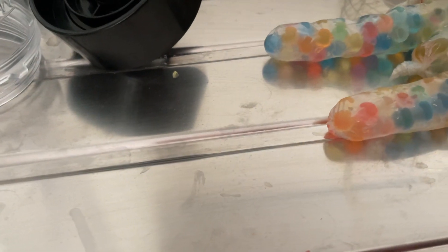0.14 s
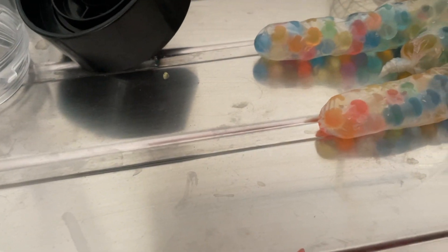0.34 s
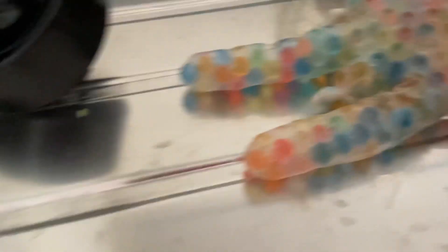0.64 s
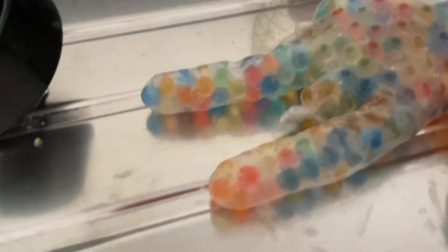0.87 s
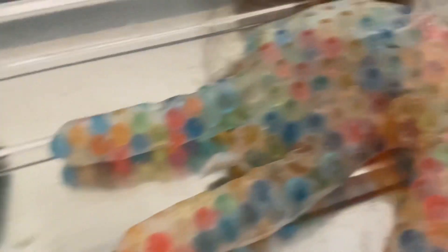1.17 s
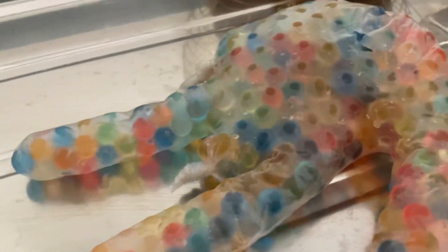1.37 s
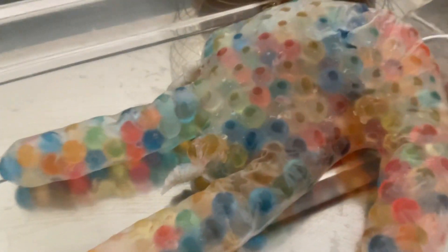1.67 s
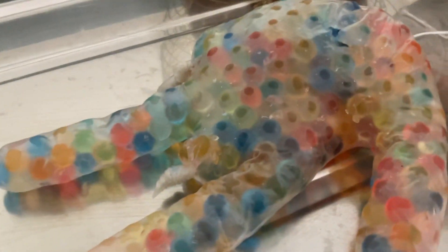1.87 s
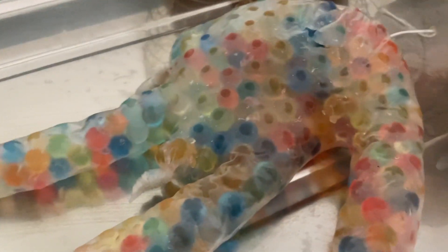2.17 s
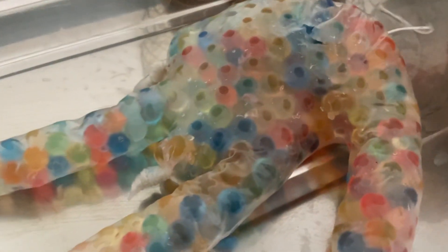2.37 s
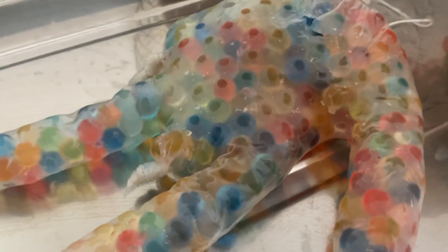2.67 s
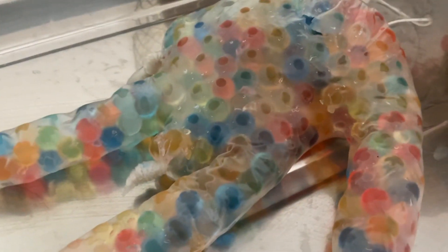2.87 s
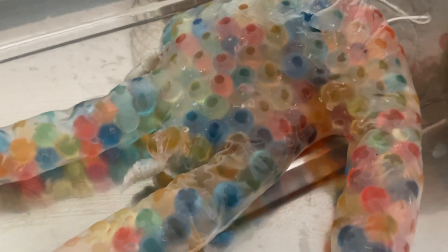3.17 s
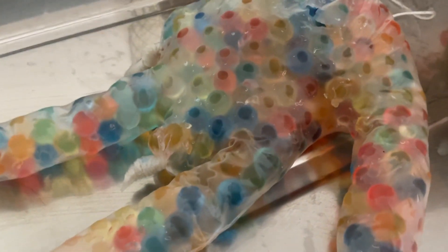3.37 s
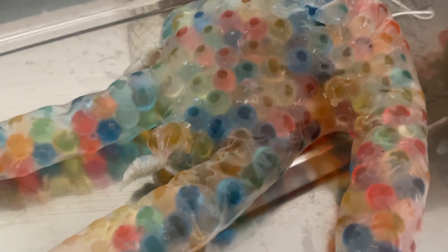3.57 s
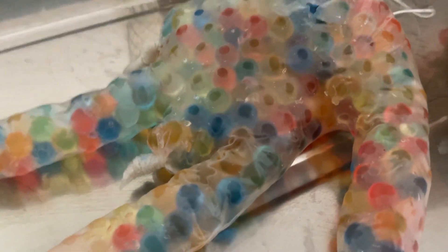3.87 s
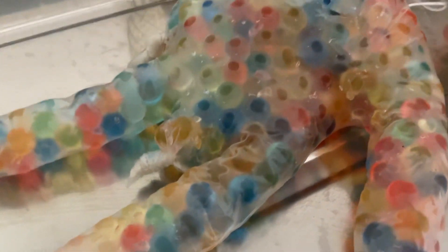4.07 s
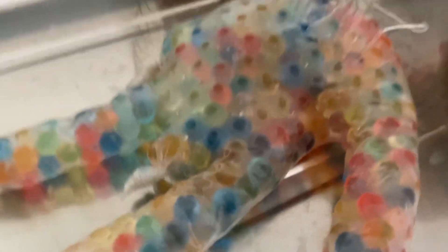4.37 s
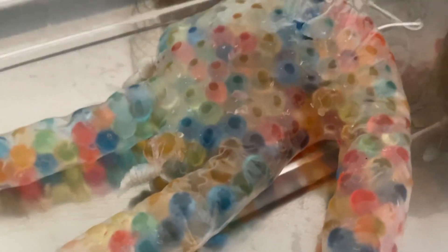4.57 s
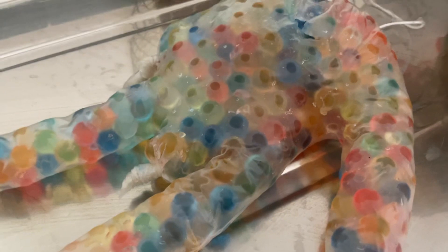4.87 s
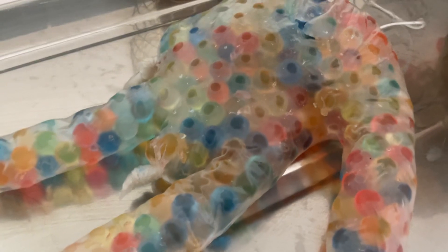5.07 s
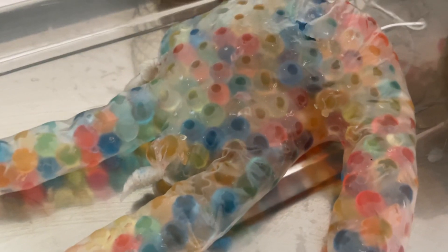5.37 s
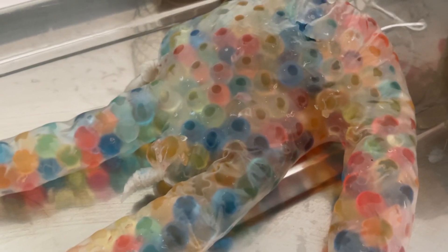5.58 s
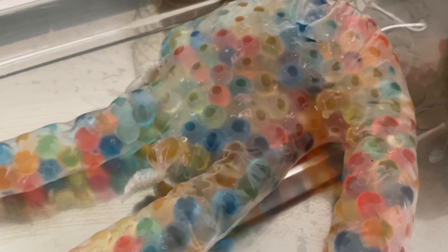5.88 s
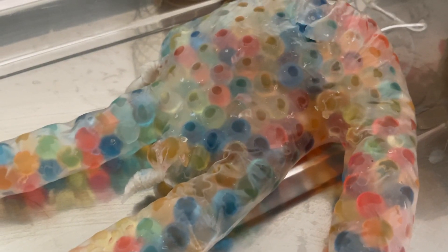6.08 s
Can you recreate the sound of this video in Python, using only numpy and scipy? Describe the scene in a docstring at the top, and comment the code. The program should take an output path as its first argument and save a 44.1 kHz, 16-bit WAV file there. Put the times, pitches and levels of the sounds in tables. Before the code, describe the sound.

A wet rubber glove full of beads is rubbed and squeezed on a metal tray, with squeaks, small snaps and dull knocks.

```python
"""A rubber glove full of wet beads, handled on a metal tray in a small hard room.
Rubber and fingers slide with a hiss of tiny slips, let go with snaps and squeak by stick-slip.
Knocks ring the tray and counter, metal clinks once; drips and the bright clicks of knocks tick sharply.
The hand holding a phone just above the tray rumbles. A clatter dies away at the start;
a motor hums over room tone and microphone hiss."""
import sys
import numpy as np
from scipy import signal
from scipy.fft import rfft, irfft
from scipy.io import wavfile
from scipy.ndimage import uniform_filter1d

SR = 44100
rng = np.random.default_rng(int(sys.argv[2]) if len(sys.argv) > 2 else 0)


def wrap_up_sound(samples):
    """Save the sound to the file named by the first command line argument, as 16-bit audio."""
    columns = np.atleast_2d(samples).T
    # keep every value between -1 and 1, then stretch to whole-number steps
    tamed = np.clip(columns, -1, 1)
    steps = np.round(tamed * 32767).astype(np.int16)
    wavfile.write(sys.argv[1], SR, steps)


N = 274743

# room tone and microphone hiss spectrum: freq_hz, density_db
AIR_SPECTRUM = [(24, -47), (40, -18), (106, -2.5), (140, -13), (203, -5.5), (224, -17), (281, -8),
                (361, -18), (389, -13.5), (552, -17.5), (726, -31), (980, -31.5), (1790, -37.5),
                (12200, -37), (15700, -40)]
# motor lines: freq_hz, rms_db
MOTOR_LINES = [(48.4, -78.5), (102.3, -74.5), (118.4, -72), (193.8, -80), (274.5, -79), (296.1, -75.5),
               (441.4, -81.5), (489.9, -80.5), (543.7, -77.5)]
# clatter spectrum: freq_hz, density_db
CLATTER_SPECTRUM = [(590, -21), (1000, -10), (1460, -18.5), (1740, -9), (2110, -3), (2450, -7), (3080, -8),
                    (4060, -11), (4310, -7), (5360, -4.5), (5800, -12.5), (8010, -12.5), (9630, -18),
                    (12800, -17), (15600, -29)]
# hand shifts on the phone: start_s, level_db, hold_s
HAND_SHIFTS = [(.39, -50.5, 0.019), (.7, -54.5, 0.075), (1.46, -57, .03), (1.62, -55, 0.083),
               (1.98, -58.5, 0.12), (2.54, -55.5, 0.023), (3.23, -59, .03), (5.679, -54.5, .14)]
# small sharp ticks, drips and the bright clicks of knocks: start_s, peak_db, pitch_hz
SHARP_TICKS = [(.218, -59.5, 2100), (0.532, -37, 1310), (2.475, -40, 1870), (3.373, -51.5, 3280),
               (3.549, -61, 2410), (3.625, -48.5, 5630), (3.627, -59.5, 10600), (3.715, -62.5, 4700),
               (4.235, -57.5, 1300), (4.328, -55.5, 2500), (4.624, -58, 9050), (4.626, -46, 3580),
               (4.636, -54, 4200), (5.308, -66.5, 2500), (5.472, -60, 6370), (5.835, -57.5, 4200),
               (6.196, -56, 9600)]
# rubber letting go: start_s, tear_db, pop_db, pop_hz, t60_s
RUBBER_SNAPS = [(0.3686, -33, -34.5, 4500, 0.021), (.4, -9, -26.5, 2500, 0.0063),
                (1.484, -25, -25.5, 2530, 0.014), (1.581, -61, -33.5, 1990, 0.02),
                (1.9544, -30, -28, 2500, 0.017), (2.0083, -44, -62, 1500, 0.0095),
                (2.021, -38, -53, 2500, .0095), (2.2903, -28, -34.5, 4740, 0.013),
                (2.3578, -37, -56, 2500, 0.0075), (3.0979, -46, -31.5, 1250, .011),
                (4.2798, -47, -50.5, 1200, 0.0063), (4.3442, -44, -43, 2500, .0066),
                (4.3832, -49, -44, 1500, 0.0076), (4.4018, -49, -41, 1400, 0.012),
                (4.654, -62, -44, 2200, 0.019)]
# snap bands: low_hz, high_hz
SNAP_BANDS_HZ = ((6500, 15700), (3500, 6500), (2000, 3500), (1000, 2000), (300, 1000))
# sliding strokes, one list each: time_s, hiss_db, dull_db (mids minus hiss)
STROKES = [
    [(.376, -58.5, 10), (.391, -53, 0.5), (.41, -57, 3.5), (.444, -47, -2), (.468, -51.5, -4),
     (.546, -41, -10.5), (.604, -43, -10.5), (.654, -41.5, -11), (.72, -51, -5.5), (.8, -60.5, 2.5)],
    [(.808, -62.5, 4), (.862, -48.5, -5), (.976, -47, -3.5), (1.038, -52.5, -3.5), (1.084, -47.5, -11.5),
     (1.15, -47, -6), (1.206, -46.5, -10), (1.348, -86, 11.5), (1.404, -66.5, 5.5), (1.456, -97, 12)],
    [(1.495, -61, 6.5), (1.511, -65.5, -17), (1.598, -83, 7), (1.607, -71, 9.5), (1.666, -99.5, 9),
     (1.748, -88, 10.5), (1.826, -101, 17.5)],
    [(1.965, -62.5, -5), (2.051, -50, -7), (2.151, -53, -9.5), (2.189, -58.5, -6.5), (2.251, -78, 2.5),
     (2.271, -64, -17), (2.3, -62.5, -2), (2.342, -61, -11)],
    [(2.35, -60, -8), (2.372, -52, -5.5), (2.436, -63, -8), (2.504, -50.5, -10.5), (2.584, -60.5, -7),
     (2.636, -73.5, -10), (2.72, -91.5, 0.5)],
    [(4.285, -58.5, 1), (4.335, -79, 5), (4.343, -67, 4), (4.369, -82, 3), (4.385, -67, 10.5),
     (4.467, -95, 7.5), (4.52, -87.5, 19.5), (4.61, -94.5, 12)],
]
# each stroke's treble, whistle and body level offsets: top_db, whistle_db, body_db
STROKE_TONE = [(-2., 1.5, -3.5), (1.5, -2, -0.5), (1., -2., 3.5), (-1., -9, 1.5), (3., -8., 5.),
               (-3., -0.5, 5.5)]
# sliding spectrum: freq_hz, density_db
SLIDE_SPECTRUM = [(120, -40), (200, -16), (293, 5), (489, -4), (631, -3), (771, -11.5), (977, -3.5),
                  (1280, -11.5), (1880, -7.5), (2180, -9), (4120, 0.5), (5620, -4.5), (8240, -11.5),
                  (10100, -3), (15600, -10)]
# sliding hiss bands: low_hz, high_hz, offset_db, dull_share
HISS_BANDS = [(6600, 11500, -1, 0.), (11500, 15800, -6, -0.42), (3200, 6130, -0.07, 0.67),
              (1200, 3220, 0., 1.), (250, 850, 1, 1.29)]
# ringing rubber folds: freq_hz, width_hz, gain_db
FOLD_MODES = [(2500, 230, -2), (3950, 340, 0), (4950, 220, -3.5), (6300, 100, -3), (7150, 45, -5.5),
              (8900, 560, 2.5), (11200, 300, -11), (12250, 350, 3), (13200, 300, -3)]
# dull knocks: start_s, peak_db, spot_hz, crack_offset_db, rise_s, wall_send_db
TRAY_KNOCKS = [(.432, -32, 590, -0.5, 0.0078, -14), (.948, -37.5, 810, -1.5, 0.0092, -10),
               (1.141, -47.5, 410, 5, 0.012, -8), (1.211, -44.5, 600, -3.5, 0.006, -10),
               (1.4844, -36, 550, -23, 0.0016, -19), (1.603, -47.5, 560, -20.5, 0.0021, -9.5),
               (1.63, -47.5, 300, -30.5, 0.0092, -7.5), (2.351, -43, 330, -15.5, 0.0037, -8),
               (2.56, -49, 430, -21, 0.011, -8), (3.373, -32.5, 361, -7, .0055, -5.5),
               (3.424, -47, 450, -10.5, 0.014, -1.5), (3.546, -33, 355, -28.5, .011, -14),
               (3.877, -47, 182, -38, 0.0073, -11), (4.0, -56.5, 360, -34.5, 0.0058, -8),
               (4.283, -35, 480, -10.5, 0.0019, -7.5), (4.306, -35.5, 301, -26, 0.0053, -7),
               (4.401, -38.5, 560, -7.5, 0.0021, -8.5), (4.623, -33.5, 360, -7.5, 0.0047, -6.5),
               (4.713, -22, 460, -11.5, 0.0086, -13), (5.31, -44, 266, -41, .008, -6)]
# tray and counter modes: freq_hz, gain_db, t60_s
TRAY_MODES = [(170, 3, .07), (206, 1.5, .07), (289, 0.5, 0.071), (343, 2, 0.072), (385.2, 2.5, .055),
              (441, -3.5, .05), (550, 3, .05), (630, -2.5, .05), (761, -5.5, .06), (1006, -3.5, .05),
              (1130, -2, 0.087)]
# wet rubber squeaks: start_s, length_s, pitch_hz, level_db, roughness_hz
RUBBER_SQUEAKS = [(0.452, 0.061, 2100, -51, 350), (0.498, 0.027, 5130, -55, 150),
                  (0.575, 0.048, 2550, -57, 200), (0.634, 0.0904, 1935, -50, 45),
                  (.68, 0.097, 4600, -58, 300), (0.801, 0.042, 4120, -55.5, 150),
                  (0.855, 0.11, 4030, -54, 200), (.86, 0.15, 12700, -52, 300), (1.035, .07, 4260, -60, 200),
                  (1.094, 0.088, 12500, -48, 300), (2.031, 0.2, 3950, -64, 250),
                  (2.045, 0.11, 3080, -64, 150), (2.169, 0.052, 1930, -62, 60),
                  (4.524, 0.029, 4330, -73, 900)]
# metal mode clusters: centre_hz, spread_hz, gain_db, t60_s
METAL_CLUSTERS = [(2380, 144, 9, 0.051), (2400, 75, -13, 0.56), (3070, 160, 0.5, 0.041),
                  (4740, 180, -4, 0.062), (9370, 135, -6, 0.072), (11400, 330, -21, 0.037),
                  (13900, 250, -14, .08), (15200, 200, -16, .04)]
# room decay: freq_hz, t60_s
ROOM_DECAY = [(200, 0.56), (1000, 0.28), (4000, .25), (12000, .12)]


def undb(db):
    return 10 ** (np.asarray(db) / 20)


def unit_rms(x):
    return x / np.sqrt(np.mean(x ** 2))


def at_peak(x, db):
    return x * undb(db) / np.abs(x).max()


def on_log(hz, table):
    """Read a (freq_hz, value) table on a log-frequency axis."""
    freqs_hz, values = np.transpose(table)
    return np.interp(np.log(np.maximum(hz, 1)), np.log(freqs_hz), values)


def colour(x, spectrum):
    """Filter by a (freq_hz, density_db) table; unit rms."""
    gain = undb(on_log(np.fft.rfftfreq(len(x), 1 / SR), spectrum))
    return unit_rms(irfft(rfft(x) * gain, len(x)))


def band(x, edges_hz):
    return signal.sosfilt(signal.butter(3, edges_hz, "bandpass", fs=SR, output="sos"), x)


def ring(x, hz, width_hz):
    return signal.lfilter(*signal.iirpeak(hz, hz / width_hz, SR), x)


def smooth(x, samples):
    return uniform_filter1d(uniform_filter1d(x, samples), samples)


def wander(rate_hz):
    """Smoothed random steps."""
    hold = int(SR / rate_hz)
    return smooth(np.repeat(rng.standard_normal(N // hold + 1), hold), hold)[:N]


def fade(t, t60_s):
    return np.exp(-np.log(1000) * t / t60_s)


def add(out, start_s, x):
    i = int(start_s * SR)
    out[i:i + len(x)] += x[:N - i]


def stroke_gain(law_db):
    """Gain over all strokes from law_db(hiss_db, dull_db, top_db, whistle_db, body_db)."""
    t, gain = np.arange(N) / SR, 0
    for stroke, tone_db in zip(STROKES, STROKE_TONE):
        time_s, hiss_db, dull_db = np.transpose(stroke)
        gate = np.interp(t, [time_s[0] - .004, time_s[0], time_s[-1], time_s[-1] + .009], [0, 1, 1, 0])
        gain = gain + gate * undb(np.interp(t, time_s, law_db(hiss_db, dull_db, *tone_db)))
    return gain


def air(rms_db=-64):
    """Room tone and microphone hiss, nearly steady."""
    return undb(rms_db + .72 * wander(4)) * colour(rng.standard_normal(N), AIR_SPECTRUM)


def motor_hum():
    """Motor lines, each wavering in level."""
    t = np.arange(N) / SR
    return sum(undb(db + 1.8 * wander(8)) * 2 ** .5 * np.sin(2 * np.pi * (hz * t + rng.random()))
               for hz, db in MOTOR_LINES)


def clatter(start_db=-49.5):
    """The tail of a clatter dying in the room."""
    t = np.arange(N) / SR
    return undb(start_db) * fade(t, t60_s=.42) * colour(rng.standard_normal(N), CLATTER_SPECTRUM)


def grip_rumble(rest_db=-69.5, rise_s=.013):
    """The hand on the phone rumbles: at rest, during strokes, under knocks and when it shifts."""
    t = np.arange(SR // 2) / SR
    sliding = stroke_gain(lambda hiss_db, *_: -62 + .39 * (hiss_db + 50))
    power = undb(rest_db) ** 2 + sliding ** 2
    shakes = [(start_s, -57.5 + .46 * (knock_db + 44), 0) for start_s, knock_db, *_ in TRAY_KNOCKS]
    for start_s, level_db, hold_s in HAND_SHIFTS + shakes:
        envelope = np.minimum(t / rise_s, 1) * fade(np.maximum(t - rise_s - hold_s, 0), t60_s=.45)
        add(power, start_s - rise_s / 2, (undb(level_db) * envelope) ** 2)
    return np.sqrt(power) * undb(2.7 * wander(25)) * unit_rms(band(rng.standard_normal(N), (65, 165)))


def ticks(half_width_hz=500):
    """Short bursts around one pitch; the fainter, the more reverberant. Returns direct, wall send."""
    direct, to_walls = np.zeros((2, N))
    t = np.arange(1500) / SR
    for start_s, peak_db, pitch_hz in SHARP_TICKS:
        burst = rng.standard_normal(len(t)) * fade(t, t60_s=.0027)
        tick = at_peak(band(burst, (pitch_hz - half_width_hz, pitch_hz + half_width_hz)), peak_db)
        wall_send_db = -6 - .6 * (peak_db + 55)
        add(direct, start_s, tick)
        add(to_walls, start_s, undb(wall_send_db) * tick)
    return direct, to_walls


def snaps(tear_hz=10100, tear_db_per_oct=10.5, pop_db_per_oct=7):
    """Rubber lets go: one release impulse, weighted to the lows, and a brief tearing noise."""
    out, t = np.zeros(N), np.arange(2000) / SR
    release = signal.unit_impulse(len(t), 20)
    for start_s, tear_db, pop_db, pop_hz, t60_s in RUBBER_SNAPS:
        envelope = np.minimum(t / .00044, 1) * fade(np.maximum(t - .001, 0), t60_s)
        tearing = rng.standard_normal(len(t)) * envelope
        for low_hz, high_hz in SNAP_BANDS_HZ:
            mid_hz = np.sqrt(low_hz * high_hz)
            tear_gain = undb(tear_db - tear_db_per_oct * np.log2(tear_hz / mid_hz))
            pop_gain = undb(pop_db - pop_db_per_oct * abs(np.log2(mid_hz / pop_hz)))
            burst = band(tearing + 16000 / high_hz * release, (low_hz, high_hz))
            add(out, start_s, np.hypot(tear_gain, pop_gain) * at_peak(burst, 0))
    return out


def slide_whistle(slips, pitch_hz=10100, width_hz=360):
    """Slips ring one high resonance, which outgrows the hiss under harder pressing."""
    def law_db(hiss_db, dull_db, top_db, whistle_db, body_db):
        return hiss_db + whistle_db - 10.5 + .47 * (hiss_db + 50)

    whistle = unit_rms(ring(ring(slips, pitch_hz, width_hz), pitch_hz, width_hz))
    flicker = undb(3 * wander(120) + 3 * wander(12))
    return stroke_gain(law_db) * flicker * whistle


def slides():
    """Countless tiny uneven slips; pressure flickers, folds ring as they open and close."""
    slips = rng.standard_normal(N) * undb(1.1 * rng.exponential(size=N) + 1.9 * wander(150))
    out = slide_whistle(slips)
    folds = sum(undb(db + 7 * wander(14)) * ring(slips, hz, width_hz) for hz, width_hz, db in FOLD_MODES)
    stretch = 1 + .04 * wander(5)  # detunes all folds together
    folds = np.interp(np.cumsum(stretch), np.arange(N), folds)
    friction = colour(slips + undb(-2.5) * folds, SLIDE_SPECTRUM)
    for low_hz, high_hz, offset_db, dull_share in HISS_BANDS:
        def law_db(hiss_db, dull_db, top_db, whistle_db, body_db):
            tone_db = top_db * (low_hz > 9000) + body_db * (low_hz < 600)
            return hiss_db + offset_db + dull_share * dull_db + tone_db

        flicker = undb(1.3 * wander(30))
        out += stroke_gain(law_db) * flicker * unit_rms(band(friction, (low_hz, high_hz)))
    return out


def knocks(crack_top_hz=2100):
    """Blows ring tray modes near the struck spot's pitch, a crack on top. Returns direct, wall send."""
    direct, to_walls = np.zeros((2, N))
    t = np.arange(9000) / SR
    for start_s, peak_db, spot_hz, crack_offset_db, rise_s, wall_send_db in TRAY_KNOCKS:
        swell = np.sin(np.pi / 2 * np.minimum(t / rise_s, 1)) ** 2  # soft contact rises slowly
        decay_s = np.maximum(t - rise_s, 0)
        modes = 0
        for hz, gain_db, t60_s in TRAY_MODES:
            distance_oct = abs(np.log2(hz / spot_hz))
            coupling_db = max(-33.5 * distance_oct, -22 - 6 * distance_oct)
            modes += undb(gain_db + coupling_db) * fade(decay_s, t60_s) * np.sin(2 * np.pi * hz * t)
        envelope = swell * fade(decay_s, t60_s=.057)
        rough = envelope * unit_rms(band(rng.standard_normal(len(t)), (.6 * spot_hz, 1.74 * spot_hz)))
        crack = band(rng.standard_normal(len(t)) * envelope, (700, crack_top_hz))
        crack = band(crack, (500, crack_top_hz))
        knock = at_peak(swell * modes + .31 * rough, peak_db) + at_peak(crack, peak_db + crack_offset_db)
        add(direct, start_s, knock)
        add(to_walls, start_s, undb(wall_send_db) * knock)
    return direct, to_walls


def squeaks(sag_per_s=.25):
    """Regular stick-slip of wet rubber: a brief, fluttering, slightly falling whistle."""
    out = np.zeros(N)
    for start_s, length_s, pitch_hz, level_db, roughness_hz in RUBBER_SQUEAKS:
        n = int(length_s * SR)
        glide_hz = pitch_hz * (1 - sag_per_s * np.arange(n) / SR)
        phase = 2 * np.pi * np.cumsum(glide_hz) / SR
        flutter_samples = int(SR / roughness_hz / 2)
        flutter = smooth(rng.standard_normal((2, n)), flutter_samples)
        steady = 12 / roughness_hz / np.sqrt(flutter_samples)
        tone = unit_rms(flutter[0] * np.cos(phase) + (flutter[1] + steady) * np.sin(phase))
        add(out, start_s, undb(level_db) * np.hanning(n) ** .5 * tone)
    return out


def clink(start_s=4.717, gain_db=-44.5, rise_s=.00053):
    """Struck metal: clusters of five close modes beat over a bright crack."""
    out, t = np.zeros(N), np.arange(18000) / SR
    modes = 0
    for centre_hz, spread_hz, cluster_db, t60_s in METAL_CLUSTERS:
        offsets = np.arange(-2, 3)[:, None] + rng.random((5, 1)) - .5
        modes_hz = centre_hz + spread_hz * offsets / 2
        cluster = np.sin(2 * np.pi * (modes_hz * t + rng.random((5, 1)))).sum(axis=0) / 2
        modes += undb(cluster_db) * fade(t, t60_s) * cluster
    crack = undb(-3) * band(rng.standard_normal(len(t)) * fade(t, t60_s=.058), (2000, 12000))
    add(out, start_s, undb(gain_db) * (modes * np.minimum(t / rise_s, 1) + crack))
    return out


def room(x, build_s=.003):
    """Wall reflections: octave bands of noise, each dying at its own rate."""
    t = np.arange(SR // 2) / SR
    tail = 0
    for hz in 110 * 2. ** np.arange(8):
        octave = band(rng.standard_normal(len(t)), (hz / 2 ** .5, hz * 2 ** .5))
        tail += octave * fade(t, on_log(hz, ROOM_DECAY))
    tail *= 1 - np.exp(-t / build_s)
    return signal.fftconvolve(x, tail / np.sqrt(np.sum(tail ** 2)))[:N]


def scene():
    """Mono mix; the further off a source, the more of it arrives from the walls."""
    rubbing, snap, metal = slides() + squeaks(), snaps(), clink()
    knock, knock_send = knocks()
    tick, tick_send = ticks()
    direct = rubbing + snap + knock + tick + metal
    walls = room(undb(-17) * rubbing + undb(-21.5) * snap + knock_send + tick_send + undb(-9) * metal)
    return (direct + walls + grip_rumble() + air() + motor_hum() + clatter())[None]


def record(dry, low_hz=40, top_hz=15700):
    """The microphone loses the deepest bass; the phone cuts the top."""
    thinned = signal.sosfilt(signal.butter(3, low_hz, "highpass", fs=SR, output="sos"), dry)
    return signal.sosfilt(signal.ellip(10, .2, 70, top_hz, fs=SR, output="sos"), thinned)


dry = scene()
out = record(dry)
wrap_up_sound(out)
```